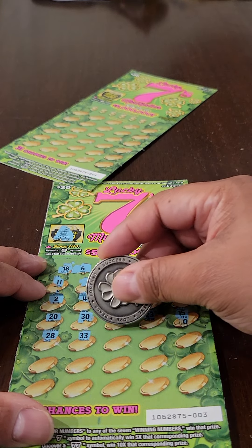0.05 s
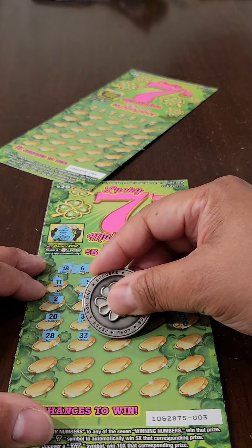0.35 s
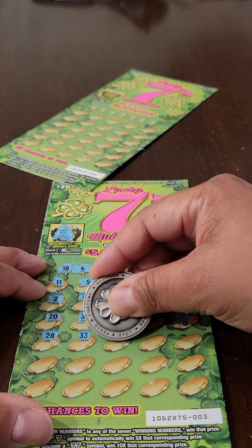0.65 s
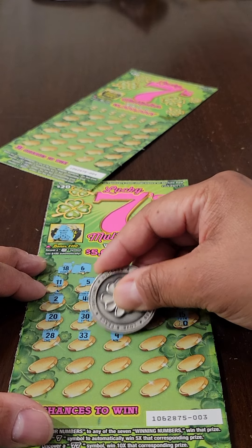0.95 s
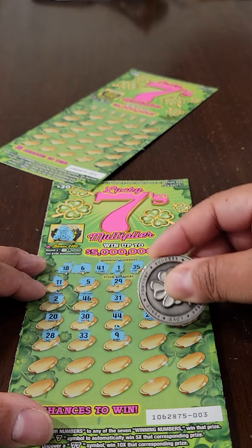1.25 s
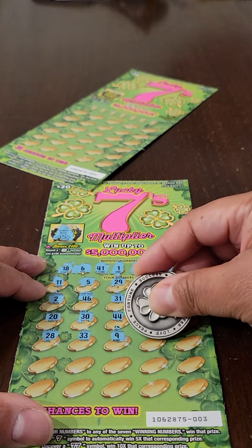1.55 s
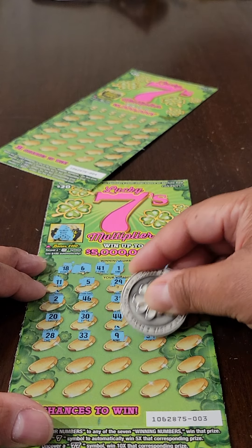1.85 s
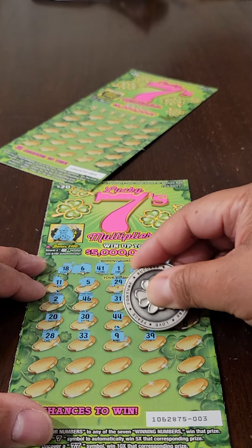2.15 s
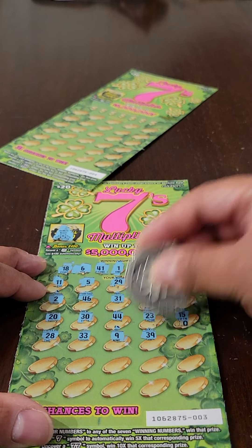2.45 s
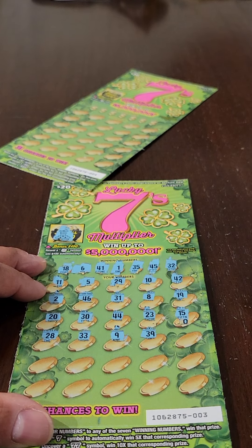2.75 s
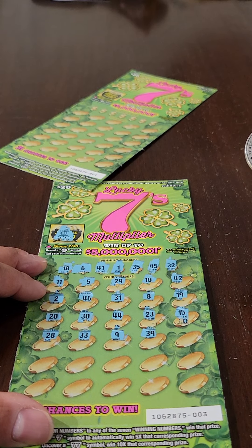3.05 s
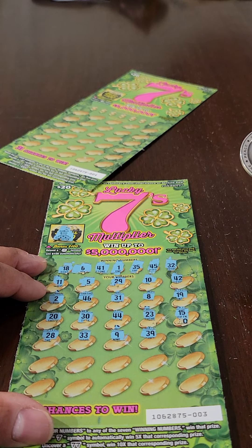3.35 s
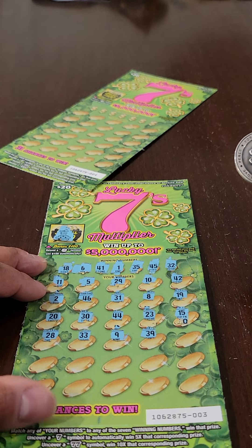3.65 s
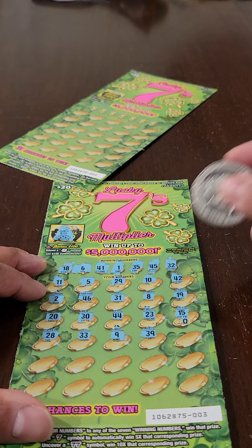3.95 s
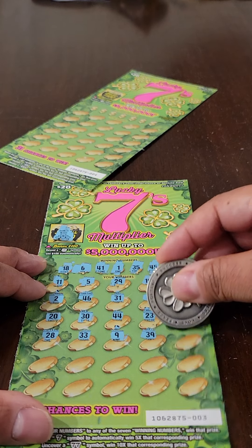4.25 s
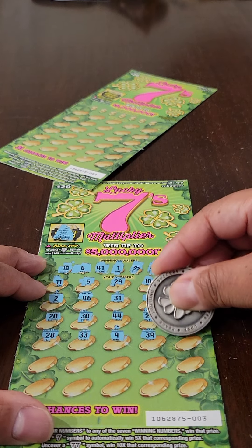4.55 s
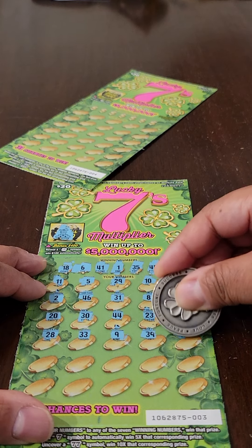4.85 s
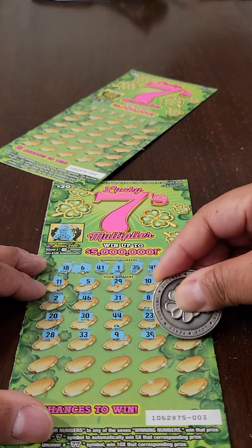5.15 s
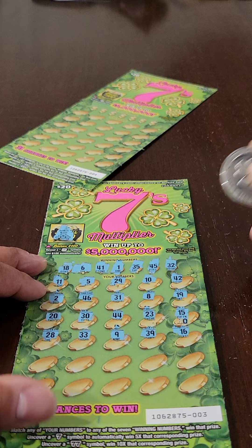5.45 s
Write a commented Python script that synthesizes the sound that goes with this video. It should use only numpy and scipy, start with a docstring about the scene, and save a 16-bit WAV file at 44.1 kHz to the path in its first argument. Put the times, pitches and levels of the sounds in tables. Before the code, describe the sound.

Close up in a quiet room, a metal coin rasps rapidly over a scratch ticket, making the wooden tabletop resonate as the coating hisses and crunches. Two runs of scraping come close together, followed by a lull, then a woody knock and a third run. Light ticks, a couple of tiny dull squeaks and soft hand slides accompany the strokes, over a faint appliance hum.

```python
"""A heavy coin scratches three spots off a paper ticket on a wooden table, close up in a small quiet room.
Push and pull alternate; each stroke is a run of tiny slips that shakes the tabletop, rasps the card and
makes the rim zing, while the coating hisses and crunches. Twice the edge judders into a short squeak.
The coin ticks, knocks and clinks as it lands and lifts; the hand slides and rumbles; an appliance hums."""
import sys
import numpy as np
from scipy import signal
from scipy.fft import rfft, irfft
from scipy.io import wavfile
from scipy.ndimage import uniform_filter1d

SR = 44100
rng = np.random.default_rng(int(sys.argv[2]) if len(sys.argv) > 2 else 0)


def transcribe(signal):
    """Save signal, clipped to [-1, 1], as a 16-bit WAV file at the path in sys.argv[1]."""
    frames = np.atleast_2d(signal).T
    limited = np.clip(frames, -1, 1)
    pcm = np.round(limited * 32767).astype(np.int16)
    wavfile.write(sys.argv[1], SR, pcm)


N = 251370
TIME = np.arange(N) / SR
RING = TIME[:SR // 3]
CARD_DETUNE, PLACE_DB = 0.044, 3  # spread of mode pitch (as a share) and level with the place of contact


def undb(db):
    """Decibels to gain."""
    return 10 ** (np.asarray(db) / 20)


def curve(rows):
    """Gain along t/s, level/dB points, silent outside their span."""
    times, db = np.transpose(rows)
    return undb(np.interp(TIME, times, db, left=-140, right=-140))


def swell(t, width):
    """A move swells with its speed, peaks at t = 0 and dies as it stops."""
    return np.exp(-2 * (t / width) ** 2)


def walk(rate):
    """Smooth random drift with a spread of 1."""
    k = max(int(SR / rate), 1)
    slow = uniform_filter1d(np.repeat(rng.standard_normal(N // k + 1), k)[:N], k)
    return slow / slow.std()


def unit(response):
    """Scale a stereo response so that it keeps the power of white noise."""
    return response / np.sqrt(np.sum(response ** 2) / 2)


def through(x, response):
    """Play a signal through a stereo response."""
    return signal.fftconvolve(np.atleast_2d(x), response, axes=1)[:, :N]


def butter(x, hz, kind, order=2):
    """Butterworth filter."""
    return signal.sosfilt(signal.butter(order, hz, kind, fs=SR, output="sos"), x)


def colour(points, size=4096):
    """Causal impulse response of an EQ curve of f/Hz, level/dB points."""
    hz, db = np.transpose(points)
    freq = np.maximum(np.arange(size // 2 + 1) * SR / size, 1)
    cepstrum = irfft(np.log(undb(np.interp(np.log(freq), np.log(hz), db))))
    cepstrum[1:size // 2] *= 2
    cepstrum[size // 2 + 1:] = 0
    return irfft(np.exp(rfft(cepstrum)))


def pan(x, pan_db, lag_s=0.00028):
    """Place a sound, left minus right in dB; it reaches the farther, right side a little later."""
    late = np.pad(x, (int(lag_s * SR), 0))[:len(x)]
    return np.array([x * undb(pan_db / 2), late * undb(-pan_db / 2)])


def add(track, start, sound):
    """Mix a stereo sound in at a time."""
    i = int(start * SR)
    track[:, i:i + sound.shape[1]] += sound[:, :N - i]


def echo(track, start, sound, delay_s=0.0082, db=-15):
    """Mix in the slap off a nearby surface."""
    add(track, start + delay_s, undb(db) * sound)


def mode(hz, width, db, lag=0):
    """A damped sine; db sets the relative height of its resonance."""
    return undb(db) * width * np.exp(-np.pi * width * RING) * np.sin(2 * np.pi * hz * RING - lag)


def stretch(response, ratio):
    """The same stereo ring with every resonance shifted by a ratio."""
    i = np.arange(len(RING) // 2)
    return np.array([np.interp(i * ratio, i, side[:len(i)], right=0) for side in response])


def touched(rings, detune, spread_db):
    """The ring at one place of contact: some modes are favoured, and all shift a little."""
    weights = undb(spread_db * rng.standard_normal(len(rings)))
    return stretch(np.tensordot(weights, rings, 1), 1 + detune * rng.standard_normal())


def scatter(x, wet_db=1.5, decay_s=0.0044, drift_hz=9, paths=4):
    """Treble bounces around hand and table; the paths drift as the hand moves, so the colour shifts."""
    decay = np.exp(-TIME[:512] / decay_s)
    weights = np.array([walk(drift_hz) for _ in range(paths)])
    weights /= np.sqrt(np.sum(weights ** 2, axis=0))
    bounces = sum(w * through(x, unit(rng.standard_normal((2, len(decay))) * decay)) for w in weights)
    return (x + undb(wet_db) * bounces) / np.hypot(1, undb(wet_db))


# EQ of the room tone: f/Hz, level/dB
AIR_EQ = [(20, -28), (40, 0.5), (80, -6.5), (160, -10), (340, -9), (620, -18.5), (1000, -25), (1370, -26),
          (1550, -34.5), (2100, -34), (2400, -46.5), (4500, -48.5), (7000, -58.5), (10000, -63.5),
          (13000, -54.5)]
def room_tone(db=-55, split_hz=650):
    """A bed of air: wide treble over a mostly shared bass that leans right."""
    bass = pan(butter(rng.standard_normal(N), split_hz, "low"), -5)
    wide = butter(rng.standard_normal((2, N)), split_hz, "high") + 0.25 * rng.standard_normal((2, N))
    air = (bass + wide) * undb(0.37 * walk(7.9))
    return undb(db) * through(air, unit(np.array([colour(AIR_EQ)] * 2)))


# partials of the appliance: f/Hz, rms level/dB
HUM_PARTIALS = [(74.5, -61.5), (120, -63), (199.5, -70.5), (237.5, -67), (320.4, -65), (480.5, -70)]
def appliance():
    """A low hum whose partials each waver in pitch and level."""
    hum = np.zeros(N)
    for hz, db in HUM_PARTIALS:
        phase = 2 * np.pi * np.cumsum(hz + 1.2 * walk(5)) / SR
        hum += np.sqrt(2) * undb(db + 2.5 * walk(4)) * np.sin(phase)
    return pan(hum, -0.5)


# modes of the tabletop under the card: f/Hz, width/Hz, left level/dB, right level/dB, right lag/rad
TABLE_MODES = [(161, 69, -9, -5.5, 0.13), (231, 21.6, -2.5, -6, 0.35), (337.8, 27.3, 3.5, 6, 0.066),
               (389, 51, -6, 0.5, 0.21), (491.6, 72.5, -8, 2, 0.39), (612, 120, -17, -30.5, 2.4),
               (743.7, 25, -4, -2.5, 3.5), (900, 37, -17.5, -7.5, 3.44), (1045, 72, -4.5, -11, 4.95),
               (1191, 27, -4, -22.5, 3.3), (1287, 74, -9, -7, 1.55), (1453, 49, -11, -6, 2.6),
               (1510, 95, -9.5, -10, 3.54), (1665, 110, -18, -9, 1.9), (1777, 135, -13.5, -10, 4.13),
               (2008, 85, -11, -21, 4.74)]
def tabletop():
    """Stereo ring of each mode; neighbours swing against each other, so a blow takes a moment to build."""
    rings = [(-1) ** k * np.array([mode(hz, width, left), mode(hz, width, right, lag)])
             for k, (hz, width, left, right, lag) in enumerate(TABLE_MODES)]
    return butter(butter(np.array(rings), 2470, "low", order=4), 140, "high")


def heel(hz=74, glide_octaves=0.2, octave_db=-7):
    """The heel of the hand sticks and slips on the wood: a low, unsteady, gliding groan."""
    phase = 2 * np.pi * np.cumsum(hz * 2 ** (glide_octaves * walk(14))) / SR
    return undb(5.6 * walk(35)) * (np.sin(phase) + undb(octave_db) * np.sin(2 * phase))


# moves of the hand: peak t/s, half width/s, slide level/dB, lean level/dB
HAND_MOVES = [(0.095, 0.13, -74, -56), (0.58, 0.38, -67.5, -39.5), (0.852, 0.075, -76, -40.5),
              (1.056, 0.26, -71, -44.5), (1.883, 0.38, -75.5, -51), (2.29, 0.21, -85, -55.5),
              (2.592, 0.072, -78, -77), (3.425, 1, -88.5, -54), (3.577, 0.073, -78.5, -76),
              (4.052, 0.17, -74, -48.5), (4.19, 0.11, -111, -45), (4.298, 0.037, -67.5, -48.5),
              (5.053, 0.54, -85, -52), (5.174, 0.055, -94, -53.5), (5.485, 0.043, -88, -75)]
# EQ of sliding skin: f/Hz, level/dB
SKIN_EQ = [(800, 1), (2600, 4), (3250, 9), (4000, -2.5), (4800, 0), (6500, -3), (9000, -8), (12000, -14),
           (16000, -9.5)]
def hand(table):
    """Sliding skin swishes over the card and stirs the wood; the leaning heel rumbles and groans."""
    slide = sum(undb(db) * swell(TIME - at, width) for at, width, db, _ in HAND_MOVES)
    lean = sum(undb(db) * swell(TIME - at, width) for at, width, _, db in HAND_MOVES)
    skin = rng.standard_normal(N) * undb(2 * walk(400)) * slide
    swish = through(skin, unit(pan(colour(SKIN_EQ), 5.5)))
    wood = through(skin * undb(7.5), unit(butter(table.sum(axis=0), 800, "high")))
    boom = colour([(15, -43.5), (35, -8), (65, 5.5), (110, 1), (160, -5.5), (260, -10),
                   (600, -43.5), (2000, -87.5)])
    rumble = through(rng.standard_normal(N) * undb(-3.5) * lean, unit(pan(boom, -14)))
    groan = pan(undb(-8) * heel() * lean, -8)
    return scatter(swish) + wood + rumble + groan


# sharp ticks of metal, nail and card: t/s, peak level/dB, f/Hz, pan/dB
TICK_CUES = [(0.1003, -39, 7640, 13.5), (.1129, -51, 7900, 6), (0.282, -55.5, 3020, -16),
             (0.5513, -42, 12500, 8), (0.554, -50, 11000, 10), (.638, -57, 6500, 10), (.837, -59, 9000, 14),
             (.97, -59, 8500, 10), (1.0888, -54, 3560, -15), (1.114, -60, 4700, 7),
             (1.164, -55.5, 3530, -15), (1.195, -56.5, 3400, -15), (1.391, -53.5, 6500, 19),
             (1.4354, -58, 3320, -17), (2.45, -47, 10960, 14), (3.539, -53, 5220, 10), (4.95, -54, 2330, 6),
             (5.347, -65, 3380, -11)]
def ticks(cues, width_octaves=0.72, skirt_db=-27, decay_s=0.0011, tail_s=0.043, ring_s=0.0019):
    """Very short cracks, each with a damped ping at its own pitch, a faint rattle and an echo."""
    out = np.zeros((2, N))
    t = TIME[:4096]
    freq = np.geomspace(500, 20000, 40)
    for start, db, hz, pan_db in cues:
        burst = rng.standard_normal(len(t)) * (np.exp(-t / decay_s) + undb(-31) * np.exp(-t / tail_s))
        eq = np.maximum(-6 * (np.log2(freq / hz) / width_octaves) ** 2, skirt_db)
        crack = signal.fftconvolve(burst, colour(np.column_stack([freq, eq])))[:len(t)]
        ping = np.exp(-t / ring_s * hz / 4700) * np.sin(2 * np.pi * hz * t)  # higher pings die sooner
        tick = crack / np.abs(crack).max() + undb(-6) * ping
        tick = butter(tick, min(0.083 * hz, 3800), "high", order=4)
        tick = pan(undb(db) * tick / np.abs(tick).max(), pan_db)
        add(out, start - 0.0003, tick)
        echo(out, start, tick)
    return out


# the coin bumping the table through the card: t/s, peak level/dB, contact/s
KNOCK_CUES = [(0.1026, -24, 0.0011), (.498, -32, 0.0014), (.568, -36, 0.00052), (.6385, -29, 0.00057),
              (.995, -37.5, 0.00055), (1.052, -31.5, 0.0013), (1.4204, -36.5, 0.0023),
              (1.676, -43.5, 0.0017), (1.895, -31, 0.00095), (2.041, -33, 0.0027), (2.174, -31.5, 0.00041),
              (2.38, -34, 0.0016), (2.437, -38, 0.00083), (4.2900, -19.5, 0.00063), (4.584, -35, 0.00072),
              (4.9499, -30, 0.00024), (5.014, -32.5, 0.00016)]
def knocks(table, detune=0.039, firm_db=-20, light_db=-33, body_db=-14, body_t60_s=0.29):
    """Woody bumps topped by a faint rim tick; a longer, softer contact leaves only the low modes."""
    bumps = np.zeros((2, N))
    for start, db, contact in KNOCK_CUES:
        push = RING * np.exp(-RING / (contact / 5))
        light = np.clip((firm_db - db) / (firm_db - light_db), 0, 1)  # light bumps vary with their place
        ring = through(push, touched(table, detune * light, PLACE_DB * light))[:, :len(RING)]
        ring = butter(ring, 180, "high")
        add(bumps, start, undb(db) * ring / np.abs(ring).max())
    # the many weak modes of the whole table ring on
    body = unit(rng.standard_normal((2, len(RING))) * 1000 ** (-RING / body_t60_s))
    after_ring = undb(body_db) * through(bumps, butter(body, [380, 1600], "band"))
    rim_ticks = ticks([(start, db - 38, 9100, 15.5) for start, db, _ in KNOCK_CUES])
    return bumps + after_ring + rim_ticks


def slips(rate, spread_db, smooth):
    """Stick-slip: tiny clicks of very uneven size over a share of smooth friction; rms 1."""
    hit = rng.random(N) < rate / SR
    clicks = hit * rng.choice([-1, 1], N) * undb(spread_db * np.minimum(rng.exponential(size=N), 4))
    force = clicks / clicks.std() + smooth * rng.standard_normal(N)
    return force / force.std()


def stroke(at, scale):
    """Sample span and envelope of a stroke: it catches quickly and dies as the coin turns round."""
    span = slice(max(int((at - 0.15) * SR), 0), int((at + 0.15) * SR))
    t = TIME[span] - at
    return span, swell(t, scale * np.where(t < 0, 0.046, 0.052))


# push and pull in turn: peak t/s, force level/dB, rasp f/Hz, wood level/dB, rim bite level/dB
COIN_STROKES = [(0.214, -47.5, 900, -45, -95), (0.338, -51.5, 1190, -44, -77.5),
                (0.426, -49, 1110, -44, -95.0), (0.499, -55, 1020, -53, -95), (0.574, -43, 1450, -46, -91),
                (0.633, -45, 1100, -42, -88), (0.721, -43.5, 1320, -43.5, -81),
                (0.782, -50, 1080, -42.5, -87), (0.859, -43.5, 1470, -45, -86),
                (0.921, -52.5, 1200, -43, -94.0), (0.99, -44, 1360, -44.5, -84.5),
                (1.052, -44, 940, -45, -77.5), (1.11, -55, 1900, -46.5, -74.5),
                (1.543, -46, 1120, -43, -88.5), (1.606, -52, 1310, -53, -91),
                (1.677, -47.5, 1030, -44.5, -93), (1.754, -44, 1280, -42.5, -89.0),
                (1.824, -50.5, 1430, -44, -87), (1.893, -49.5, 1510, -45.5, -89),
                (1.963, -63, 1230, -42, -98.0), (2.038, -43, 1340, -44, -86),
                (2.103, -53, 1420, -46, -98.0), (2.172, -45, 1230, -44, -90),
                (2.236, -44.5, 1250, -42, -82.5), (2.316, -46, 1490, -47.5, -96),
                (2.384, -47.5, 1190, -44.5, -85), (2.443, -58, 1060, -47.5, -90),
                (4.427, -44, 1060, -42, -80), (4.512, -47.5, 1380, -54.5, -92),
                (4.581, -50.5, 1230, -46, -87), (4.657, -46.5, 1540, -46, -90),
                (4.71, -50.5, 1200, -41.5, -90.0), (4.785, -37.5, 1390, -46, -74.5),
                (4.861, -49, 1380, -47, -82), (4.953, -41.5, 1590, -44, -86),
                (5.012, -45.5, 1310, -47, -83), (5.074, -51, 1510, -58, -90),
                (5.144, -50.5, 1430, -44.5, -106.5), (5.215, -50, 1440, -54.5, -93),
                (5.278, -54, 1460, -49.5, -108.0)]
def wood_judder(force, table):
    """Friction shakes the low modes of the tabletop, at a new place on each stroke."""
    out = np.zeros((2, N))
    low_modes = butter(table, 770, "low", order=3)
    for at, _, _, db, _ in COIN_STROKES:
        span, envelope = stroke(at, 0.77)
        ring = unit(touched(low_modes, CARD_DETUNE, PLACE_DB))
        add(out, TIME[span.start], through(force[span] * undb(db) * envelope, ring))
    return out


def card_rasp(force, card, band_ratio=1.464):
    """A band of friction rasps the card, whose resonances shift with the place pressed."""
    out = np.zeros((2, N))
    for at, db, hz, _, _ in COIN_STROKES:
        span, envelope = stroke(at, 0.6)
        grit = butter(force[span], [hz / band_ratio, hz * band_ratio], "band", order=3)
        ring = unit(stretch(card, 1 + CARD_DETUNE * rng.standard_normal()))
        add(out, TIME[span.start], through(grit * undb(db) * envelope, ring))
    return out


def edge_grind(fine, trim_db=-21, pitch_ratio=1.65, band_ratio=1.18):
    """The sharp edge grinds in a narrow band above the rasp."""
    out = np.zeros((2, N))
    for at, db, hz, _, _ in COIN_STROKES:
        span, envelope = stroke(at, 0.46)
        edge = butter(fine[span], [hz * pitch_ratio / band_ratio, hz * pitch_ratio * band_ratio], "band")
        out[:, span] += pan(undb(db + trim_db) * edge / edge.std() * envelope, 2)
    return out


# resonances of the pinched coin's rim: f/Hz, width/Hz, level/dB
RIM_MODES = [(4040, 790, -17.5), (6300, 200, -24), (7350, 270, -13), (7760, 240, -16.5), (9080, 130, -20.5),
             (10050, 330, -32), (12800, 1900, -28)]
def rim_zing(fine, boost_db=13, grip_detune=0.012, grip_db=3):
    """Fine slips ring the rim; on each stroke the grip shifts its resonances and favours some."""
    out = np.zeros((2, N))
    drive = fine * undb(2.8 * walk(110))  # the rim touches unevenly
    for at, _, _, _, bite_db in COIN_STROKES:
        span, envelope = stroke(at, 0.45)
        grip = 1 + grip_detune * rng.standard_normal(len(RIM_MODES))
        favour = grip_db * rng.standard_normal(len(RIM_MODES))
        rim = sum((-1) ** k * mode(hz * grip[k], width, db + favour[k])
                  for k, (hz, width, db) in enumerate(RIM_MODES))
        ring = unit(pan(rim[:2048], 17))
        add(out, TIME[span.start], through(drive[span] * undb(bite_db + boost_db) * envelope, ring))
    return out


# EQ of the coating's hiss: f/Hz, left level/dB, right level/dB
COATING_EQ = [(910, -16.5, -16), (1810, 9.5, 1), (2140, 5.5, 0.5), (2670, 1, -2), (3160, 7, 1.5),
              (3580, -1, -3.5), (3850, -4, -8.5), (4640, -2.5, -8.5), (5170, -11, -26), (5840, -11.5, -36),
              (6630, -19, -20), (9800, -24, -35.5), (16000, -45, -36)]
def flakes(plough, boost_db=12.5, tear_db=-27, spray_db=-3.5):
    """Coating hisses off as it is ploughed, bitten by the rim and torn by sheer force."""
    press = np.zeros(N)
    for at, force_db, _, _, bite_db in COIN_STROKES:
        span, envelope = stroke(at, 0.63)
        press[span] += np.hypot(undb(bite_db + boost_db), undb(force_db + tear_db)) * envelope
    coating = np.array([colour(np.array(COATING_EQ)[:, [0, side]]) for side in (1, 2)])
    coating[1] = pan(coating[1], -2)[1]
    # flakes crack all round the edge, so each side gets some hiss of its own
    shared, *apart = (slips(rate=3500, spread_db=5, smooth=0.68) for _ in range(3))
    cracks = (shared + undb(spray_db) * np.array(apart)) / np.hypot(1, undb(spray_db))
    return through(cracks * np.hypot(plough * undb(3.5), press), unit(coating))


# judders of the edge: t/s, length/s, level/dB, slip rate/Hz, f/Hz
SQUEAK_CUES = [(0.191, 0.037, -46, 148, 1090), (4.413, 0.046, -52, 140, 1130)]
def squeaks(band_ratio=1.1, attack_s=0.005, release_s=0.03, jitter=0.011):
    """Nearly regular slips ring one narrow resonance of the card: a short, dull squeak."""
    out = np.zeros((2, N))
    for start, length, db, rate, hz in SQUEAK_CUES:
        cycles = np.cumsum(rate * (1 + jitter * walk(60)[:len(RING)])) / SR
        pulses = np.diff(np.floor(cycles), prepend=-1)
        ring = butter(pulses, [hz / band_ratio, hz * band_ratio], "band")
        envelope = np.clip(np.minimum(RING / attack_s, (length - RING) / release_s), 0, 1)
        add(out, start, pan(undb(db) * envelope * ring / ring.std(), 3.5))
    return out


# the edge ploughing the coating, one fader curve per spot: t/s, level/dB
PLOUGH_CURVES = [
    [(0.305, -75), (0.341, -58.5), (0.369, -72), (0.867, -77), (0.911, -85), (1.159, -68), (1.32, -80.5)],
    [(1.34, -75), (1.398, -65.5), (1.404, -66), (1.856, -62.5), (2.224, -68.5), (2.236, -63.5),
     (2.52, -100)],
    [(4.37, -77), (4.4, -78), (4.422, -67), (4.96, -67), (5.1, -78.5), (5.232, -69.5), (5.42, -100)],
]
def scratching(table, turn_db=-2):
    """The edge ploughs the ticket: coarse slips drive wood and card, fine slips the grind and zing."""
    chatter = undb(2 * walk(260))  # the edge catches and lets go
    chatter /= chatter.std() + chatter.mean()
    force = slips(rate=1400, spread_db=3.5, smooth=0.24) * chatter
    fine = slips(rate=6200, spread_db=1.5, smooth=0.36) * chatter
    speed = np.zeros(N)
    for at, *_ in COIN_STROKES:
        span, envelope = stroke(at, 1.2)
        speed[span] = np.maximum(speed[span], envelope)
    plough = sum(curve(spot) for spot in PLOUGH_CURVES) * undb(turn_db * (1 - speed))  # dips at the turns
    card = unit(butter(table.sum(axis=0), 810, "high", order=3))
    body = wood_judder(force, table) + card_rasp(force, card) + through(force * plough * undb(8.5), card)
    treble = edge_grind(fine) + rim_zing(fine) + flakes(plough) + crumbs(speed)
    return body + scatter(treble)


# loose crumbs, one fader curve for each of the first two spots: t/s, level/dB
CRUMB_CURVES = [
    [(.31, -60), (.55, -58), (.72, -54.5), (.95, -72), (1.13, -73), (1.22, -85)],
    [(1.45, -80), (1.85, -78), (2.25, -84), (2.45, -78)],
]
# EQ of their crunch: f/Hz, level/dB
CRUNCH_EQ = [(2000, -5), (3700, -2), (4400, -13), (5300, 4), (6200, 12), (7200, -5), (9600, 3), (11500, 1),
             (15500, -13)]
def crumbs(speed, trim_db=-17.5, turn_db=-5):
    """Crumbs of coating crunch under the edge: sparse bright grains that follow the strokes."""
    grains = slips(rate=1600, spread_db=5, smooth=0.26) * sum(curve(spot) for spot in CRUMB_CURVES)
    return through(grains * undb(trim_db + turn_db * (1 - speed)), unit(pan(colour(CRUNCH_EQ), 16)))


# the coin's edge touching down: t/s, peak level/dB
CLINK_CUES = [(1.393, -45), (4.2636, -46.5)]
# modes of the coin between the fingers: f/Hz, decay/s, level/dB
COIN_MODES = [(3940, .003, -27), (4440, 0.013, -17), (4840, 0.00062, 5), (5800, 0.0047, -22),
              (6950, 0.0017, -19)]
def clinks():
    """The coin rings for a moment before the fingers damp it."""
    out = np.zeros((2, N))
    ring = sum(undb(db) * np.exp(-RING / decay) * np.sin(2 * np.pi * hz * RING)
               for hz, decay, db in COIN_MODES)
    ring = butter(ring, [3600, 8000], "band")
    for start, db in CLINK_CUES:
        clink = pan(undb(db) * ring / np.abs(ring).max(), 13)
        add(out, start, clink)
        echo(out, start, clink)
    return out


# light passes of the hand: peak t/s, half width/s, level/dB
BRUSH_CUES = [(4.085, 0.07, -76), (5.483, 0.089, -82)]
# EQ of their swish: f/Hz, level/dB
BRUSH_EQ = [(2500, -19), (4700, 5), (6400, -4), (7600, 1), (9200, -2), (10200, -4), (12000, -10),
            (16000, -6)]
def brushes():
    """The hand brushes past with an airy swish."""
    envelope = sum(undb(db) * swell(TIME - at, width) for at, width, db in BRUSH_CUES)
    return scatter(through(rng.standard_normal(N) * envelope, unit(pan(colour(BRUSH_EQ), 1))))


def reverb(x, wet_db=-12, treble_db=-8, low_t60_s=0.5, high_t60_s=0.39, predelay_s=0.00368):
    """Nearby walls and furniture give a short, dull, wide tail."""
    noise = rng.standard_normal((2, len(RING)))
    low = butter(noise, 2970, "low") * 1000 ** (-RING / low_t60_s)
    high = butter(noise, 1900, "high") * 1000 ** (-RING / high_t60_s)
    tail = unit((low + undb(treble_db) * high) * (RING > predelay_s))
    return undb(wet_db) * through(x, butter(tail, 365, "high"))


def scene():
    """Hand, coin and card up close, over reverb, room tone and hum."""
    table = tabletop()
    foley = hand(table) + ticks(TICK_CUES) + knocks(table)
    foley += scratching(table) + squeaks() + clinks() + brushes()
    return foley + reverb(foley) + room_tone() + appliance()


def record(dry, top_hz=15900):
    """A steep low-pass cuts the very top."""
    return signal.sosfilt(signal.ellip(10, 0.2, 70, top_hz, fs=SR, output="sos"), dry)


dry = scene()
out = record(dry)
transcribe(out)
```